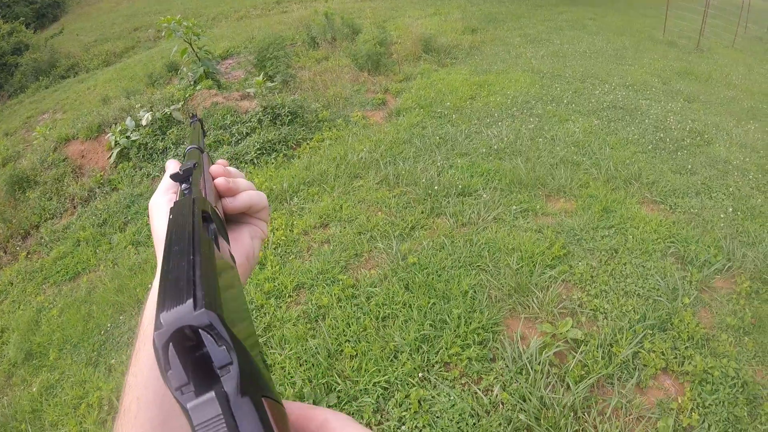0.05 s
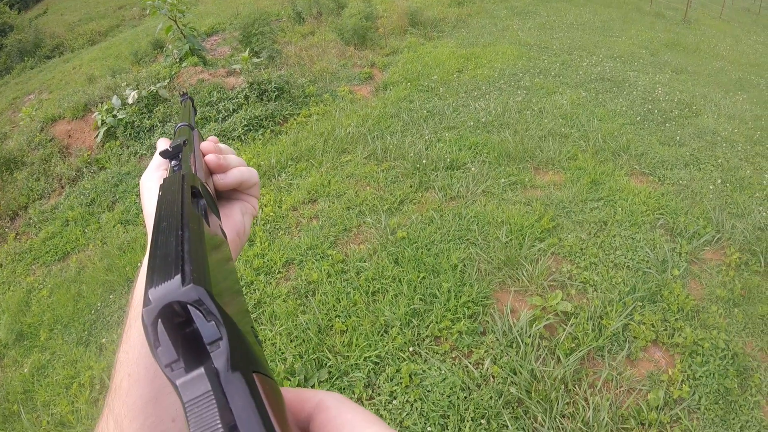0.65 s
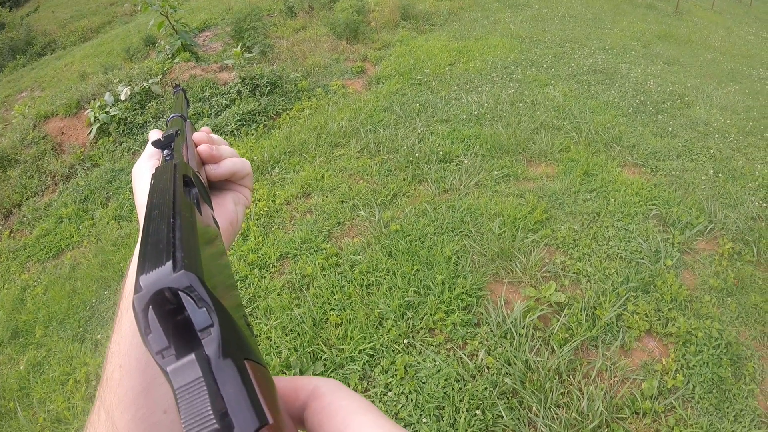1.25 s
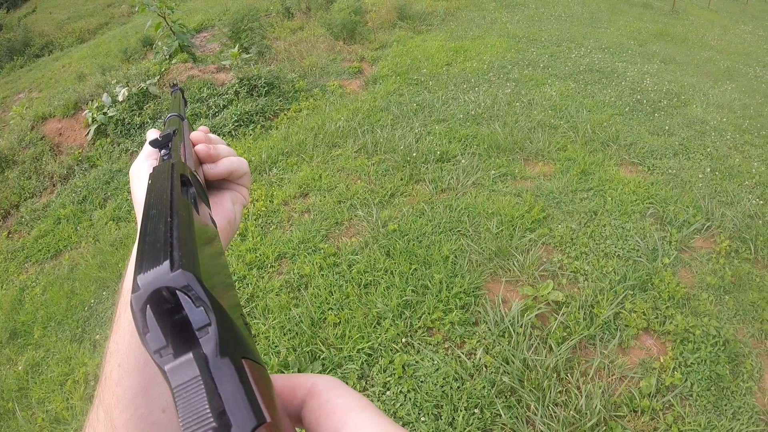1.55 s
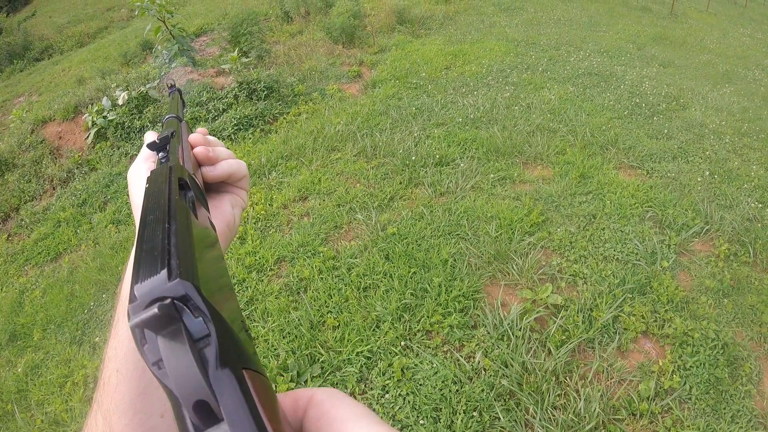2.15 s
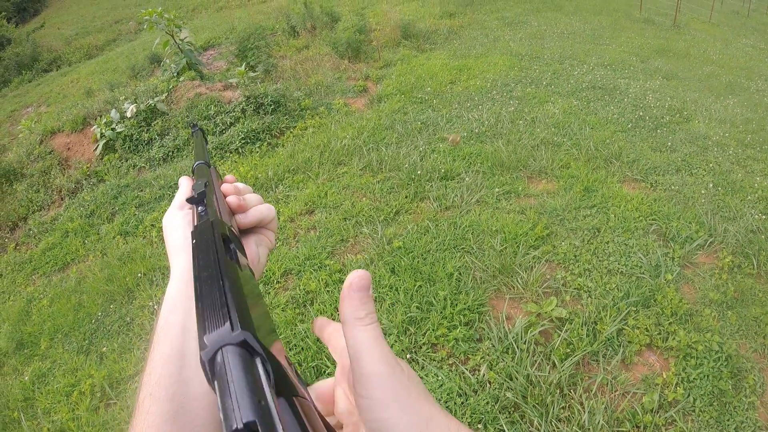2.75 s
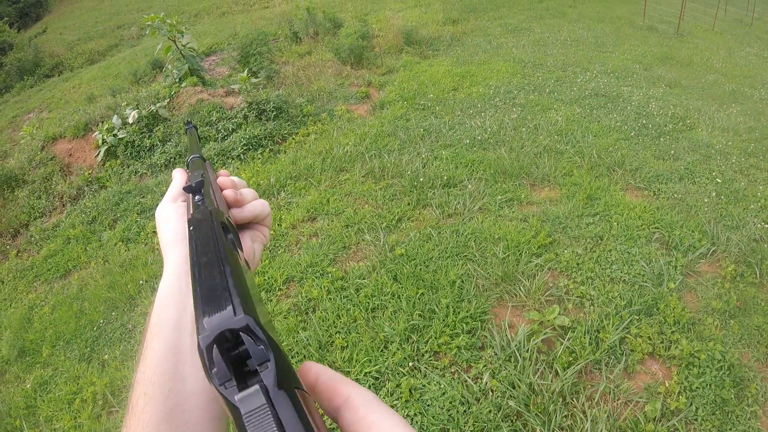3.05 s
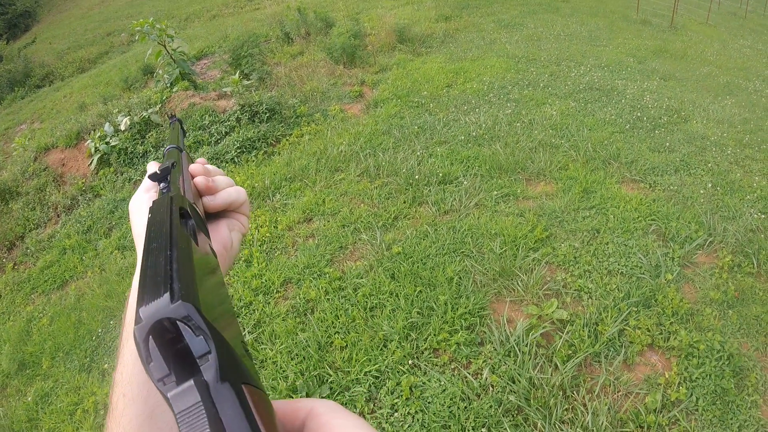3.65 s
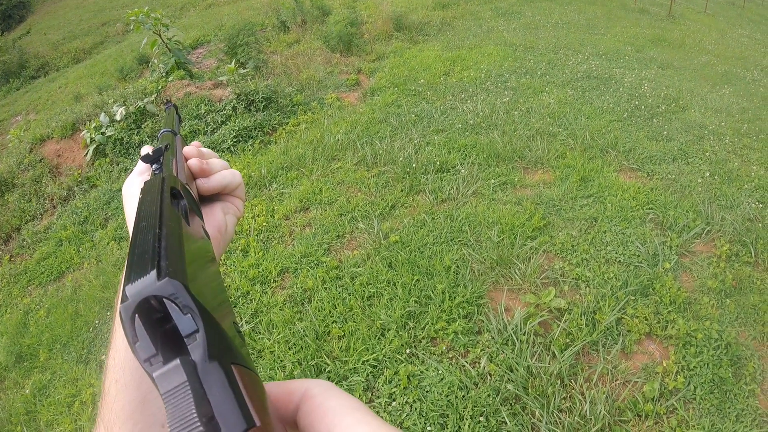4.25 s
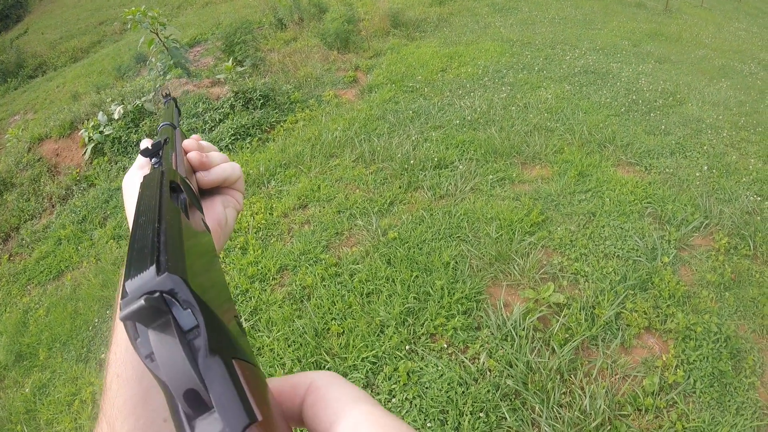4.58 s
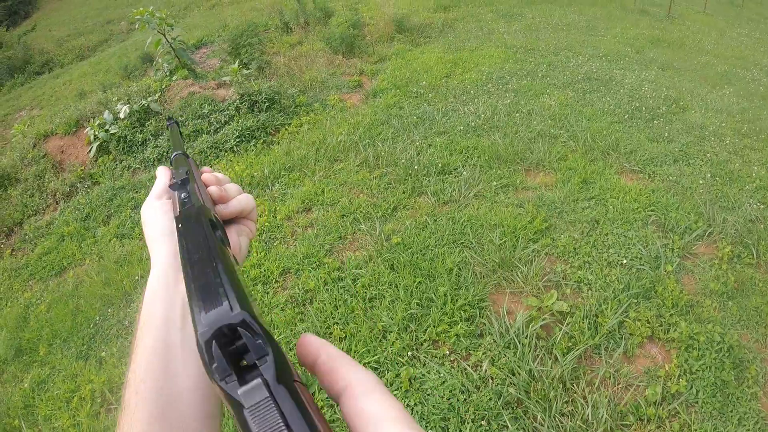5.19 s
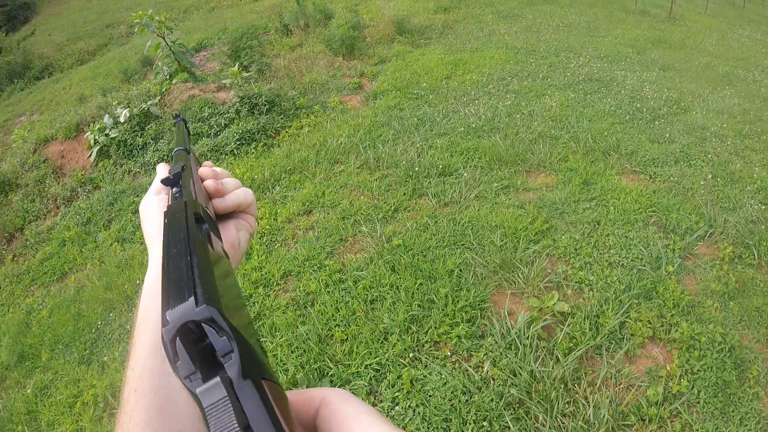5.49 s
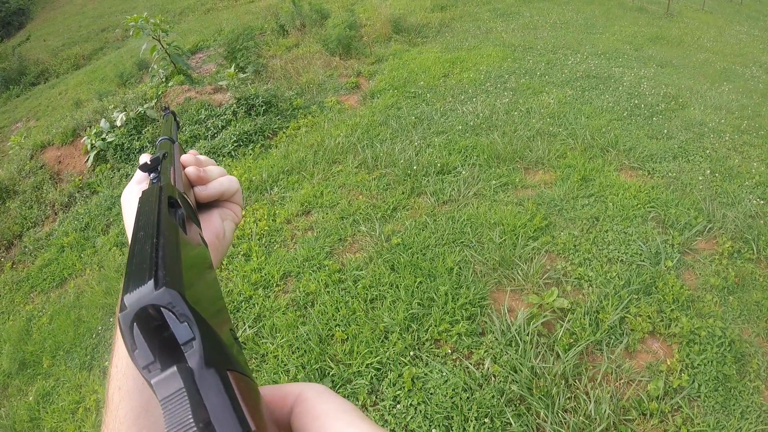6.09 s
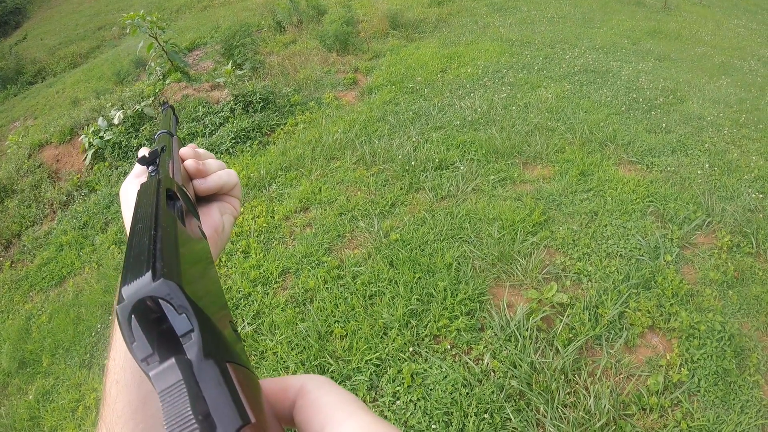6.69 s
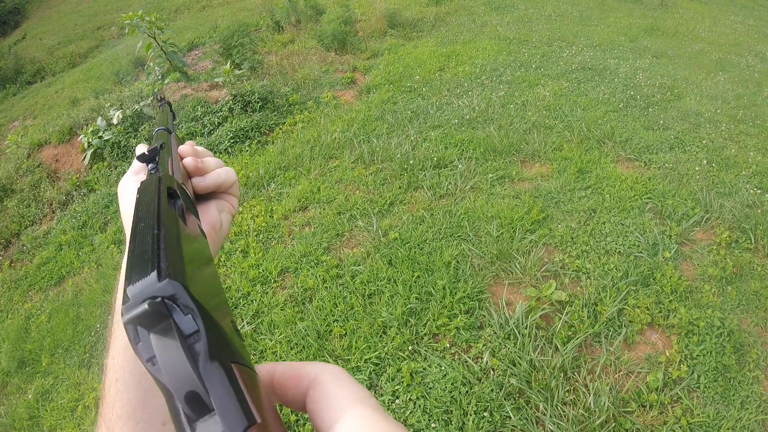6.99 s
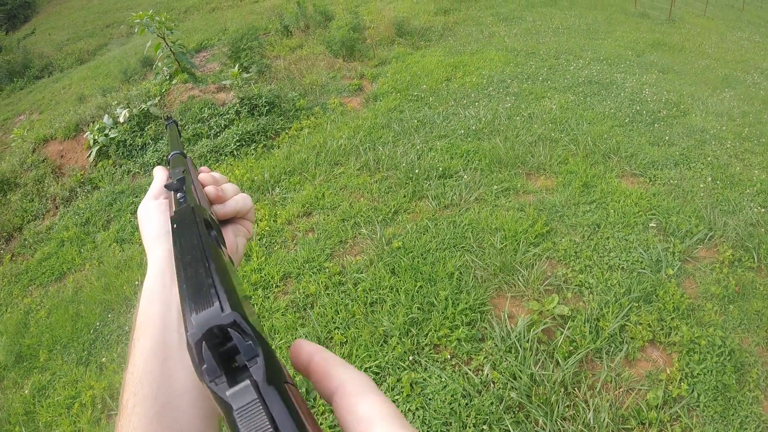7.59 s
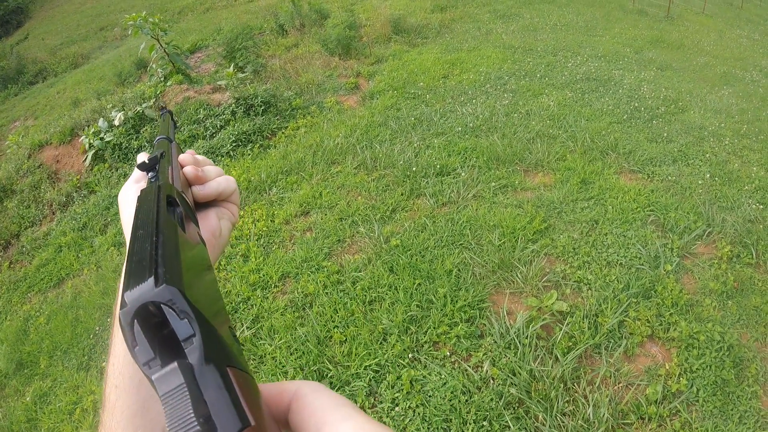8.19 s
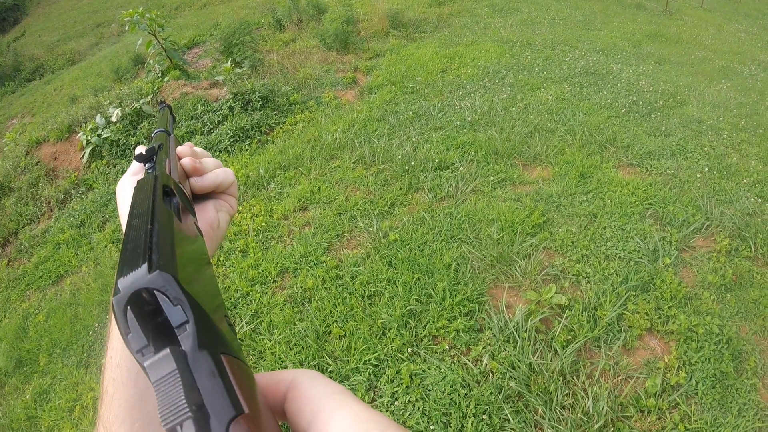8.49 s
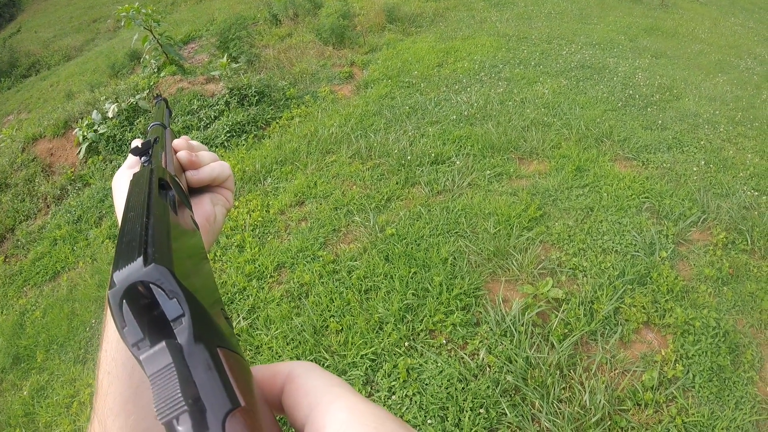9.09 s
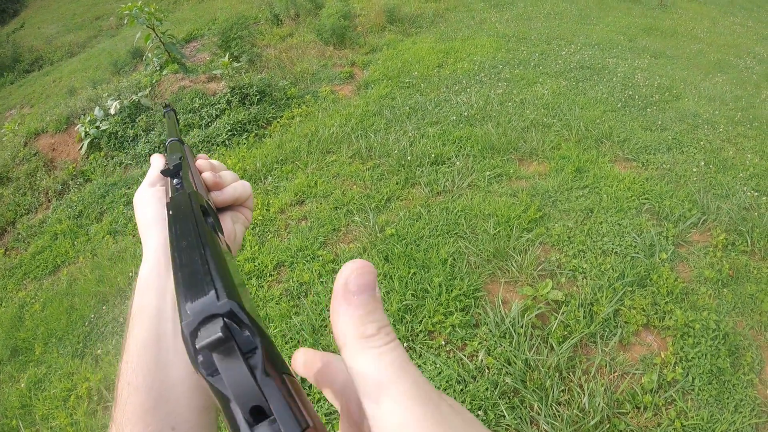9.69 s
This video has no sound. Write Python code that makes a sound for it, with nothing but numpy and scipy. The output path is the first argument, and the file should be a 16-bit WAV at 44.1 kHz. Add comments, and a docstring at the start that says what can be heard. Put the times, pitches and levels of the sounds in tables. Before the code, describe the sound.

Four sharp shots from a small rifle go off right in front of the microphone, evenly spaced, each with a low thump and a rolling outdoor echo. Between shots the steel lever clacks open and snaps shut, and it opens once more at the end. Behind this lies a quiet field with chirping birds, insect hiss, distant traffic hum, slight wind and, near the last shot, a faint motor slowing down.

```python
"""Small birds call over the faint traffic hum and insect hiss of a grassy field. From about 2 s a small
lever-action rifle fires four times, just ahead of the microphone. Each shot is a low thump and a double
crack that overloads the microphone, then scatters off the grass and rolls back from the trees.
The lever is thrown open and shut, its impacts ringing steel and walnut. A breeze rises after the first
shot, a far motor slows around the fourth, and the lever opens one last time."""
import sys
import numpy as np
from scipy import signal
from scipy.fft import rfft, irfft
from scipy.io import wavfile
from scipy.ndimage import uniform_filter1d

SR = 44100
rng = np.random.default_rng(int(sys.argv[2]) if len(sys.argv) > 2 else 0)


def dump_mix(stems):
    """Bounce the given channels to the path in sys.argv[1] as a 16-bit WAV at rate SR."""
    frames = np.atleast_2d(stems).T  # one column per channel
    limited = np.clip(frames, -1, 1)  # hard clip at full scale
    pcm = np.round(limited * 32767).astype(np.int16)
    wavfile.write(sys.argv[1], SR, pcm)


N = 433944
TIME = np.arange(N) / SR


def undb(db):
    """Decibels to amplitude ratio."""
    return 10 ** (np.asarray(db) / 20)


def unit(x):
    """Normalisation to rms 1."""
    return x / np.sqrt(np.mean(x ** 2) + 1e-20)


def clock(seconds):
    """Sample times of a short sound."""
    return np.arange(int(seconds * SR)) / SR


def add(out, start_s, x):
    """Superposition of x onto out from start_s on."""
    i = int(start_s * SR)
    out[i:i + len(x)] += x[:max(len(out) - i, 0)]


def colour(x, spectrum, size=4096):
    """Minimum-phase filtering to a (frequency_hz, level_db) outline, at unit power gain."""
    hz, db = np.transpose(spectrum)
    bin_hz = np.arange(size // 2 + 1) * SR / size
    gain = unit(undb(np.interp(np.log(bin_hz + 1), np.log(hz), db)))
    cepstrum = irfft(np.log(gain))[:size // 2]
    cepstrum[1:] *= 2
    impulse_response = irfft(np.exp(rfft(cepstrum, size)))
    return signal.fftconvolve(x, impulse_response)[:len(x)]


def band(x, low_hz, high_hz):
    """Steep band-pass filtering."""
    edges_hz = [low_hz, min(high_hz, SR / 2 - 1)]
    return signal.sosfilt(signal.butter(3, edges_hz, "band", fs=SR, output="sos"), x)


def wander(rate_hz):
    """Slow random modulation with a spread near 1."""
    return np.interp(TIME * rate_hz, np.arange(1000), rng.standard_normal(1000))


def burst(decay_s, spectrum):
    """A transient: exponentially decaying noise, filtered to a spectrum."""
    t = clock(.2)
    return colour(rng.standard_normal(len(t)) * np.exp(-t / decay_s), spectrum)


# Spectrum of the countryside: frequency_hz, density_db
FIELD_SPECTRUM = [(60, -19), (105, -33.5), (135, 2), (180, 4), (260, -3), (400, -6.5), (600, -13.5),
                  (1200, -18.5), (2500, -25.5), (3600, -30.5), (4400, -37.5), (6000, -32), (6600, -28),
                  (9000, -28.5), (12000, -37), (15000, -43)]

def field(level_db=-49.0):
    """Broadband noise of far traffic and insects, with slight amplitude modulation of the hum."""
    air = unit(colour(rng.standard_normal(N), FIELD_SPECTRUM))
    return undb(level_db) * (air + .15 * wander(27) * band(air, 100, 500))


def field_dip(recovery_s=1.55):
    """Gain envelope: the background sinks at each shot and creeps back, slowly at first."""
    db = 0
    for start_s, *_, dip_db in SHOT_EVENTS:
        age = (TIME - start_s) / recovery_s
        db = db + dip_db * (age > 0) * np.maximum(1 - age ** 2, 0)
    return undb(db)


# Course of a far motor: time_s, pitch_hz, level_db
MOTOR_COURSE = [(7.799, 180.4, -59.5), (8.298, 170, -49.5), (8.699, 162, -48), (9.25, 146, -50),
                (9.401, 149, -54)]

def motor():
    """An unsteady tone whose frequency falls with the speed of rotation."""
    time_s, pitch_hz, level_db = np.transpose(MOTOR_COURSE)
    phase = 2 * np.pi * np.cumsum(np.interp(TIME, time_s, pitch_hz) + 4.0 * wander(25)) / SR
    envelope_db = np.interp(TIME, time_s, level_db, left=-120, right=-120) + 2.8 * wander(18)
    return np.sqrt(2) * np.sin(phase) * undb(envelope_db)


# Strength of the breeze: time_s, level_db
GUSTS = [(0, -67), (1.8, -83), (2.7, -62), (3.15, -50), (3.65, -44.5), (4.4, -52), (5.1, -54), (5.5, -56),
         (5.85, -55), (6.5, -61), (7.2, -60), (7.6, -51.5), (8.2, -51.5), (9.84, -66.5)]

def breeze():
    """Turbulence at the microphone: low-frequency pressure noise that follows the gusts."""
    spectrum = [(12, -17.5), (30, 3.5), (80, -4.0), (130, -6.0), (300, -31.0), (2000, -68.5)]
    rumble = unit(colour(rng.standard_normal(N), spectrum))
    return rumble * undb(np.interp(TIME, *np.transpose(GUSTS)) + 1.9 * wander(15))


def whistle(length_s, start_hz, end_hz, waver_hz=35, flutter_db=3.0):
    """A linear glide, randomly modulated in frequency and amplitude on its long path."""
    progress = clock(length_s) / length_s
    pitch_hz = start_hz + (end_hz - start_hz) * progress + waver_hz * wander(90)[:len(progress)]
    envelope = np.sqrt(2 * np.sin(np.pi * progress)) * undb(flutter_db * wander(60)[:len(progress)])
    return envelope * np.sin(2 * np.pi * np.cumsum(pitch_hz) / SR)


# Paired chips of a nearby bird: start_s, gap_s, level_db
CHIP_PAIRS = [(0.116, .093, -46.5), (.945, .098, -47.5), (1.826, .104, -48), (3.428, 0.13, -52.5),
              (5.855, .108, -53), (6.666, .105, -48.5), (8.48, .097, -51)]
# Whistles of far birds: start_s, length_s, start_hz, end_hz, level_db
FAR_WHISTLES = [(.63, 0.14, 3550, 3330, -70), (.79, .14, 3250, 3065, -70.5), (7.88, 0.27, 3430, 3040, -71),
                (8.6, 0.21, 3510, 3190, -64), (8.739, .1, 3000, 2750, -66), (8.91, .05, 2090, 2250, -65),
                (8.96, .07, 2255, 2940, -66.5)]

def birds(top_hz=3900, droop_hz=640, chip_s=.034, run_start_s=.935, run_step_s=.2):
    """Frequency-modulated tones: arched chips nearby, gliding whistles further off."""
    out = np.zeros(N)
    progress = clock(chip_s) / chip_s
    droop = np.interp(progress, [0, .2, .35, .48, .7, 1], [1.1, .25, -.08, .1, .7, 1.1])
    envelope = np.sqrt(2) * np.sin(np.pi * progress)
    for first_s, gap_s, level_db in CHIP_PAIRS:
        for start_s in (first_s, first_s + gap_s):
            pitch_hz = (top_hz - droop_hz * droop) * (1 + 0.01 * rng.standard_normal())
            phase = 2 * np.pi * np.cumsum(pitch_hz) / SR
            overtone = undb(-18) * np.exp(-2 * droop) * np.sin(1.5 * phase)
            add(out, start_s, undb(level_db) * envelope * (np.sin(phase) + overtone))
    for k in range(5):  # an even run of rising notes
        add(out, run_start_s + k * run_step_s, undb(-64) * whistle(.07, start_hz=1700, end_hz=2270))
    for start_s, length_s, start_hz, end_hz, level_db in FAR_WHISTLES:
        add(out, start_s, undb(level_db) * whistle(length_s, start_hz, end_hz))
    return out


def reverberation(spectrum, rise_s, hold_s, patchy_db):
    """Diffuse scattering: half-octave noise bands build up, hold unevenly and decay at their own rates."""
    t, out = clock(2.2), 0
    hz, db, t60_s = np.transpose(spectrum)

    def patches():
        return np.interp(t * 40, np.arange(90), rng.standard_normal(90))

    for centre_hz in 125 * 2 ** (np.arange(15) / 2):
        uneven_db = patchy_db * patches() * (400 < centre_hz < 3000)
        gain = undb(np.interp(np.log(centre_hz), np.log(hz), db) + uneven_db) * np.sqrt(centre_hz)
        band_t60_s = np.interp(np.log(centre_hz), np.log(hz), t60_s)
        fade = undb(-60 * np.maximum(t - hold_s, 0) / band_t60_s)
        noise = unit(band(rng.standard_normal(len(t)), centre_hz / 2 ** .25, centre_hz * 2 ** .25))
        out = out + gain * fade * noise
    onset = 1 / (1 + (rise_s / (t + 1e-4)) ** 6)
    return undb(patchy_db / 2 * patches()) * onset * out / np.std(out[:SR // 10])


# Scatter from grass and bushes, and from the trees: frequency_hz, density_db, t60_s
GRASS_SCATTER = [(150, -3, .6), (480, -17, .6), (850, -0.5, .9), (1800, 0, 1.0), (2980, 1.5, 0.7),
                 (5450, -1.5, 1), (6800, -5.5, .6), (10000, -15, .5), (11100, -26.5, .5),
                 (15000, -32.5, 0.11)]
TREE_SCATTER = [(147.2, -9.5, 1.5), (450, 4, 7.9), (740, 9, 4.5), (1600, 8.5, 3.04), (2300, 2, 1.9),
                (3200, -8, 1.7), (5500, -14, 1.1), (7960, -40, 0.27), (15000, -50, 0.46)]

def shot_echoes(bank_s=0.298, bank_width_s=0.066, bank_db=2.0):
    """Reflections in order of path length: a hiss from the grass, a swell off a bank, a roll from trees."""
    out = np.zeros(N)
    tree_spectrum = [row[:2] for row in TREE_SCATTER]
    for start_s, *_, grass_db, trees_db, _ in SHOT_EVENTS:
        hiss = reverberation(GRASS_SCATTER, rise_s=0.08, hold_s=.28, patchy_db=3.3)
        swell = np.exp(-((TIME[:len(hiss)] - bank_s) / bank_width_s) ** 2)
        bank = swell * unit(colour(rng.standard_normal(len(hiss)), tree_spectrum))
        roll = reverberation(TREE_SCATTER, rise_s=0.32, hold_s=0.9, patchy_db=2.55)
        add(out, start_s, undb(grass_db) * hiss + undb(trees_db) * (undb(bank_db) * bank + roll))
    return out


def grass_echo(source):
    """Convolution with the unit-energy impulse response of the field."""
    response = reverberation(GRASS_SCATTER, rise_s=0.011, hold_s=.03, patchy_db=-0.5)
    response /= np.sqrt(np.sum(response ** 2))
    return signal.fftconvolve(source, response)[:N]


def duck(near, knee_db=-24.5, release_s=0.17):
    """Gain compression: the smoothed power of near blows pushes the far sounds down for a moment."""
    pole = np.exp(-1 / (release_s * SR))
    power = signal.lfilter([1 - pole], [1, -pole], near ** 2)
    return 1 / np.sqrt(1 + power / undb(knee_db) ** 2)


def impact(modes, rattle_s, scatter_db=6.5, detune=0.019):
    """Modal excitation: a rattling contact drives damped resonances; rms 1 over the first 5 ms."""
    t = clock(.15)
    hz, db, t60_s = modes.T[:, :, None]
    level_draw, pitch_draw = rng.standard_normal((2, len(modes), 1))
    envelopes = undb(db + scatter_db * level_draw - 60 * t / t60_s)
    phases = 2 * np.pi * hz * (1 + detune * pitch_draw) * t + rng.uniform(0, 2 * np.pi, hz.shape)
    response = (envelopes * np.sin(phases)).sum(0)
    contact = rng.standard_normal(len(t)) * np.exp(-t / rattle_s)
    struck = band(signal.fftconvolve(contact, response)[:len(t)], hz.min() * 0.29, hz.max() * 0.88)
    return struck / np.sqrt(np.mean(struck[:SR // 200] ** 2))


# Modes of the walnut stock (4 rows), receiver (6) and small steel parts: pitch_hz, level_db, t60_s
RIFLE_MODES = [(205, -6, 0.022), (464, -15.5, 0.0067), (805, 4, 0.018), (1173, -8, 0.01),
               (1765, 1.5, 0.012), (1960, -6, 0.022), (2335, -3, 0.018), (2640, -6, 0.015),
               (2864, -0.5, 0.0084), (3470, 2.5, 0.0075), (4490, -10.5, 0.0063), (4560, -12.5, 0.012),
               (5080, 8.5, 0.0058), (5550, 5.5, 0.0073), (6020, -4.5, 0.0061), (6470, -8.5, 0.007),
               (7100, -6.5, 0.0076), (8320, -8, 0.0098), (9520, -9, 0.013), (10260, -5, 0.0085),
               (13460, -31, .01)]
# Dry snap of steel on steel: frequency_hz, density_db
SNAP_SPECTRUM = [(1000, -24.5), (2800, 6.5), (5500, 14.5), (7500, 3), (10300, 4), (11800, -26),
                 (14000, -14.5), (16000, -19)]

def clatter(stage, start_s, level_db, bright_db, snap_db=2.0, stock_per_bright=-0.54):
    """Impact sound: each blow rings receiver, small parts and stock; a duller stroke favours the stock."""
    out = np.zeros(N)
    stock, receiver, steel = np.split(np.array(RIFLE_MODES), [4, 10])
    for delay_s, receiver_db, steel_db, stock_db, rattle_s in stage:
        small_parts = impact(steel, rattle_s)
        add(small_parts, 0, undb(snap_db) * burst(rattle_s, SNAP_SPECTRUM))
        wood = undb(stock_db + stock_per_bright * bright_db) * impact(stock, rattle_s)
        blow = impact(receiver, rattle_s) + wood + undb(steel_db + bright_db) * small_parts
        add(out, start_s + delay_s, undb(level_db + receiver_db) * blow)
    return out


def ring(modes):
    """Free vibration of steel: damped sinusoids that outlast a blow."""
    t = clock(.3)
    return np.sqrt(2) * sum(undb(db - 60 * t / t60) * np.sin(2 * np.pi * hz * t) for hz, db, t60 in modes)


# Scrape of the bolt, also the colour of a shot's close reflections: frequency_hz, density_db
SCRAPE_SPECTRUM = [(300, -15), (900, -5), (2200, 0), (3700, -3.5), (5400, 3), (7500, -11.5), (10200, -6),
                   (11500, -27.5), (15000, -34)]

def friction(roughness_db=6.9, grain_samples=64):
    """Sliding friction: noise whose level jumps from grain to grain."""
    noise = rng.standard_normal(N)
    grains = np.repeat(rng.standard_normal(N // grain_samples + 1), grain_samples)[:N]
    return unit(colour(noise * undb(roughness_db * grains), SCRAPE_SPECTRUM))


def bolt_travel(first_s, last_s, lead_s=.038, run_on_s=.027):
    """A smoothed gate, open while the bolt slides from just before one blow to just after another."""
    moving = (TIME > first_s - lead_s) & (TIME < last_s + run_on_s)
    return uniform_filter1d(moving.astype(float), size=400)


# Blows in each stage of a stroke, steel and stock relative to the receiver:
# delay_s, receiver_db, steel_db, stock_db, rattle_s
UNLOCK_BLOWS = [(-.0265, -34.5, 4, -5.5, .0035), (-.02, -30, -4.5, -9, .003), (0, -26.5, 3, -13.5, .0015),
                (.0155, -39.5, -6.5, -8, .003), (.027, -40, -9.5, -13.5, .0012)]
THROW_BLOWS = [(-.0125, -27, 5, -26.5, .0015), (-.007, -39.5, 10.5, -11.5, .002),
               (0, -17.5, 0.5, -20, .0018), (0.0134, -31, 9, 0.5, .0008), (0.0159, -31, 0, 2.5, .0038)]
TAKE_UP_BLOWS = [(0, -41, 2, -12, .002)]
FEED_BLOWS = [(-.04, -33.5, -6.5, -22.5, .003), (-.029, -37, -6, -7, .0026), (-.0175, -35, -7, 5, .004),
              (0, -22.5, -1, -11.5, .0036), (.003, -28, 3.5, -16, .0013), (.02, -30.5, -6, -4, .0013)]
LOCK_BLOWS = [(-.011, -22, 0, -10, .003), (0, -18.5, 5, -8, 0.0014), (.0175, -33, -2.5, -3.5, .0017)]
# Modes of the lever loop and of the bolt: pitch_hz, level_db, t60_s
LOOP_MODES = [(2340, -15.5, 0.02)]
BOLT_MODES = [(3100, -46, 0.22), (5620, -38, 0.2), (5800, -46, .12), (6050, -46.5, 0.14), (9300, -49, .08)]
# Lever thrown open, quieter the first time: stop_s, unlock_lead_s, level_db, bright_db
OPENING_STROKES = [(2.7248, .0583, -16, -5), (4.9303, 0.054, -0.5, -1), (7.3261, .0626, -1, 0.5),
                   (9.8006, 0.061, -0.5, 0)]
# Lever pulled shut, quieter the first time: lock_s, feed_lead_s, slack_lead_s, level_db, bright_db
CLOSING_STROKES = [(2.9764, 0.05, .126, -11.5, -10.5), (5.177, 0.048, .1404, -1, 1),
                   (7.5789, .051, .1478, -2.5, 1.5)]

def lever(slide_back_db=-44, slide_home_db=-37.5):
    """Impact and friction: the bolt unlocks and slides to its stop, then feeds a cartridge and locks."""
    out = np.zeros(N)
    scrape = friction()
    for stop_s, unlock_lead_s, level_db, bright_db in OPENING_STROKES:
        unlock_s, eject_s = stop_s - unlock_lead_s, stop_s + THROW_BLOWS[0][0]
        out += clatter(UNLOCK_BLOWS, unlock_s, level_db, bright_db)
        out += clatter(THROW_BLOWS, stop_s, level_db, bright_db)
        out += scrape * bolt_travel(unlock_s, stop_s) * undb(slide_back_db + level_db + bright_db)
        for start_s in (unlock_s, eject_s):
            add(out, start_s, undb(level_db) * ring(LOOP_MODES))
    for lock_s, feed_lead_s, slack_lead_s, level_db, bright_db in CLOSING_STROKES:
        for stage, lead_s in ((TAKE_UP_BLOWS, slack_lead_s), (FEED_BLOWS, feed_lead_s), (LOCK_BLOWS, 0)):
            out += clatter(stage, lock_s - lead_s, level_db, bright_db)
        steel_gain = undb(level_db + bright_db)
        out += scrape * bolt_travel(lock_s - feed_lead_s, lock_s) * undb(slide_home_db) * steel_gain
        add(out, lock_s, steel_gain * ring(BOLT_MODES))
    return out


def thump(swell_s, blast_db, swell_hz=141, decay_hz=175, decay_s=0.0062, crest_s=0.0019, push_s=0.00054):
    """A low oscillation swells and decays around a blast wave; the shot falls 0.1 s in."""
    t = clock(.2) - .1
    since_s = t - crest_s
    envelope = np.where(since_s < 0, np.exp(-(since_s / swell_s) ** 2), np.exp(-since_s / decay_s))
    body = envelope * np.cos(2 * np.pi * since_s * np.where(since_s < 0, swell_hz, decay_hz))
    body *= 1 - 0.55 * np.exp(-((t - .0012) / 0.0019) ** 2)  # the swell breaks as the crack hits
    front = (t - .0036) / push_s
    blast = -front * np.exp(-front ** 2)  # overpressure, then suction
    after_s = np.maximum(t, 0)
    sub_bass = np.exp(-after_s / 0.0056) * np.sin(2 * np.pi * 52 * after_s)
    return body + undb(blast_db) * blast + undb(-7.0) * sub_bass


# Spectrum of the crack: frequency_hz, density_db
CRACK_SPECTRUM = [(150, -21), (400, -4), (2800, 4), (3900, -1.5), (5000, 2.5), (6200, 4), (7000, -0.5),
                  (8300, -7.5), (9700, 1.5), (11500, -17.5), (15000, -33)]

def double_crack(level_db, gap_s=0.0035):
    """Two broadband pressure transients in quick succession."""
    crack = np.zeros(SR // 4)
    add(crack, 0, burst(.0012, CRACK_SPECTRUM))
    add(crack, gap_s, burst(.0007, CRACK_SPECTRUM))
    return crack * undb(level_db)


# Close reflections, relative to the crack: delay_s, level_db, decay_s
CLOSE_SLAPS = [(.003, -34, 0.034), (.035, -24, 0.0063), (.055, -33.5, .004)]
# Dull ground reflections, relative to knock_db: delay_s, level_db
GROUND_KNOCKS = [(.010, 5), (0.056, -2), (.066, -4), (.08, -5)]
# Their spectrum: frequency_hz, density_db
KNOCK_SPECTRUM = [(60, -7.5), (200, 1.5), (600, -9), (1500, -15.5), (3000, -25.5), (9000, -46.5)]
# The shots, blast relative to thump:
# start_s, crack_db, thump_db, swell_s, blast_db, knock_db, grass_db, trees_db, dip_db
SHOT_EVENTS = [(2.1432, -1.5, -0.5, .020, 6.5, -42, -50, -51, -18),
               (4.4619, 2, -8.5, .013, 8, -22.5, -38, -44, -2),
               (6.8079, 1, -6.5, .017, -16, -26.5, -42, -46, -5),
               (9.311, 1.5, -8, .014, 4, -32, -41, -46.5, -4)]

def shots(stutter_s=0.01, stutter_db=-10.5, reference_swell_s=.015, rumble_db=-31):
    """Superposed transients: a low swell and ticks lead into the crack, then slaps, knocks and rumble."""
    out = np.zeros(N)
    rumble_spectrum = [(30, -6), (90, -3), (170, 0), (400, -6), (1500, -36), (8000, -70)]
    for start_s, crack_db, thump_db, swell_s, blast_db, knock_db, *_ in SHOT_EVENTS:
        add(out, start_s, double_crack(crack_db))
        for k in range(1, 4):  # weak ticks run ahead of the crack, stronger with a longer swell
            tick = double_crack(crack_db + k * stutter_db * reference_swell_s / swell_s)
            add(out, start_s - k * stutter_s, .4 * band(tick, 900, 6400) + 1.3 * band(tick, 5880, 6260))
        add(out, start_s - .1, thump(swell_s, blast_db) * undb(thump_db))
        for delay_s, level_db, decay_s in CLOSE_SLAPS:
            add(out, start_s + delay_s, burst(decay_s, SCRAPE_SPECTRUM) * undb(crack_db + level_db))
        for delay_s, level_db in GROUND_KNOCKS:
            add(out, start_s + delay_s, burst(.003, KNOCK_SPECTRUM) * undb(knock_db + level_db))
        add(out, start_s, burst(.035, rumble_spectrum) * undb(rumble_db))
    return out


def scene():
    """Superposition of near and far sources; lever and birds also return faintly from the field."""
    action, song = lever(), birds()
    echo = grass_echo(undb(-36.0) * action + undb(-12.5) * song)
    far = duck(action) * (shot_echoes() + echo + field_dip() * field()) + song + motor()
    return (shots() + action + far + breeze())[None]


def record(dry, ceiling=.95, cutoff_hz=15400):
    """Hard clipping as the shots overload the microphone, then a steep low-pass."""
    low_pass = signal.ellip(8, .2, 60, cutoff_hz, fs=SR, output="sos")
    return signal.sosfilt(low_pass, np.clip(dry, -ceiling, ceiling))


dry = scene()
out = record(dry)
dump_mix(out)
```